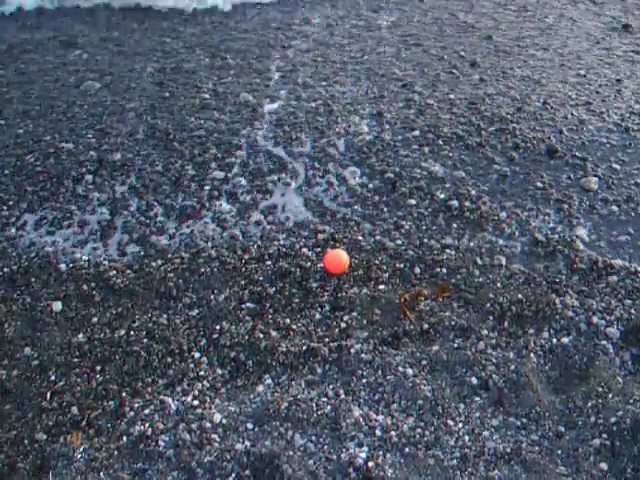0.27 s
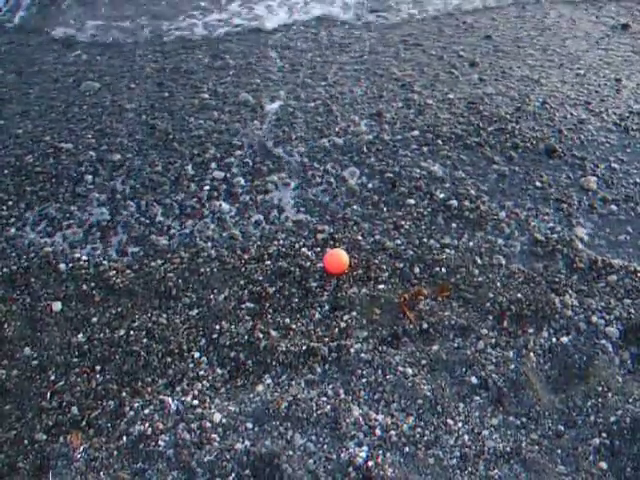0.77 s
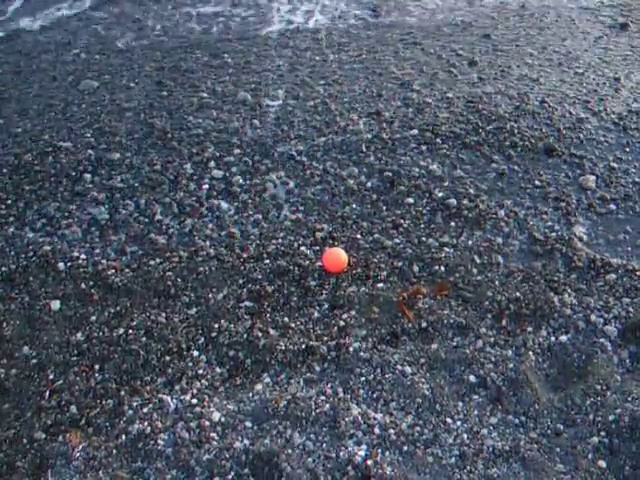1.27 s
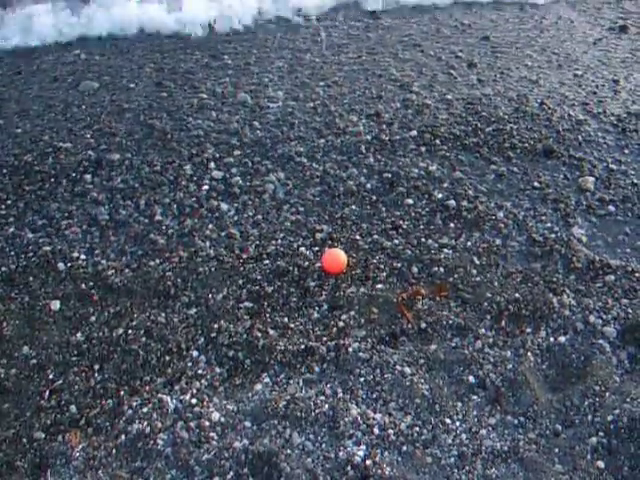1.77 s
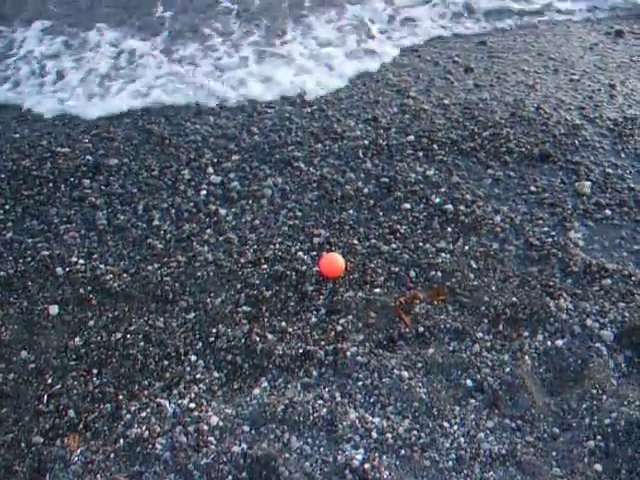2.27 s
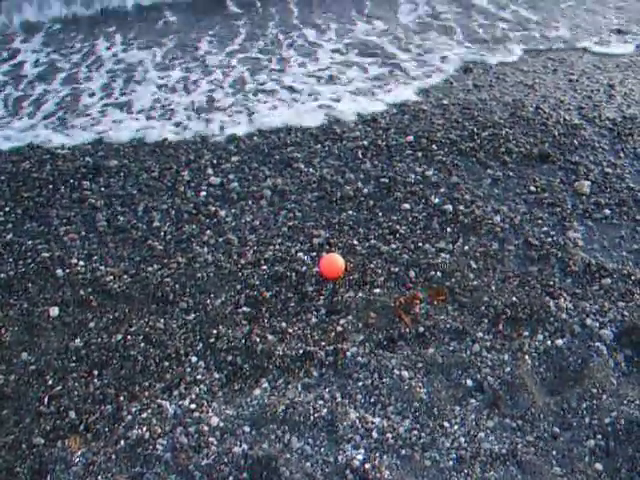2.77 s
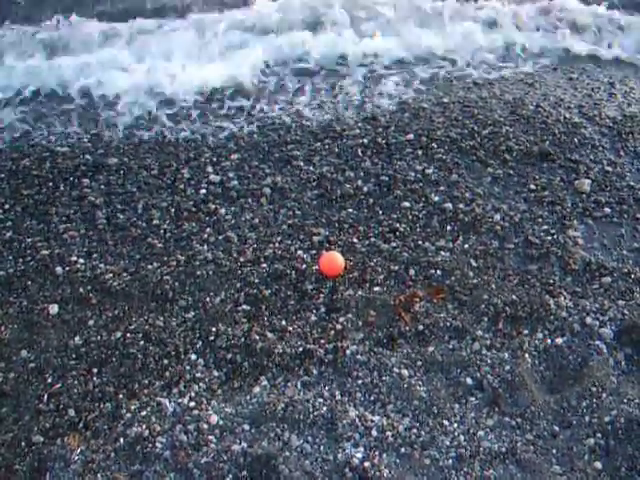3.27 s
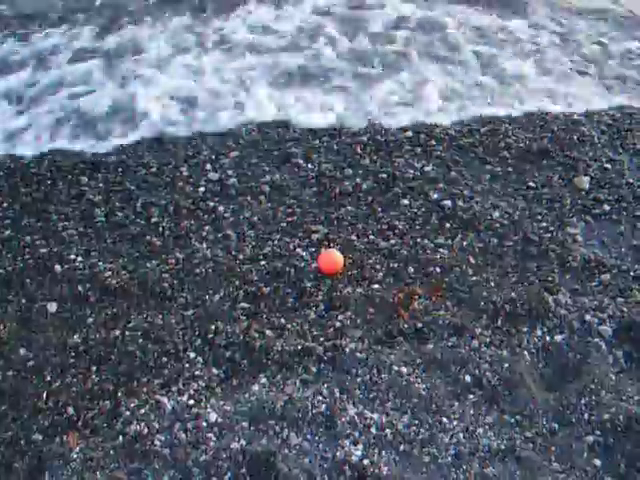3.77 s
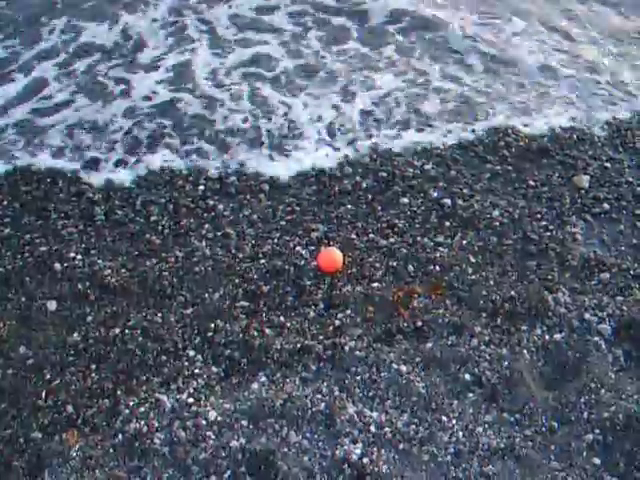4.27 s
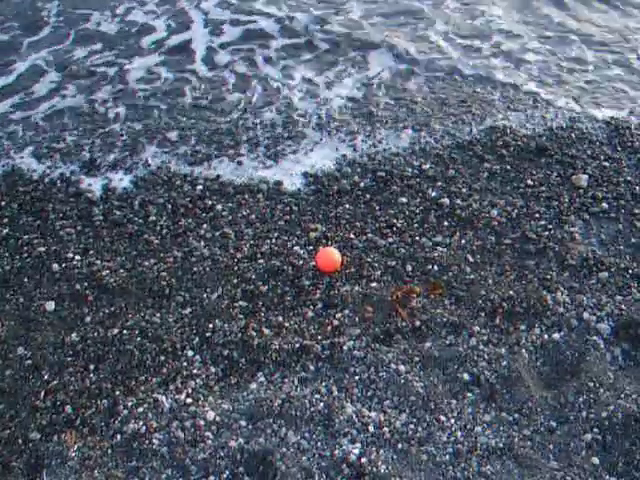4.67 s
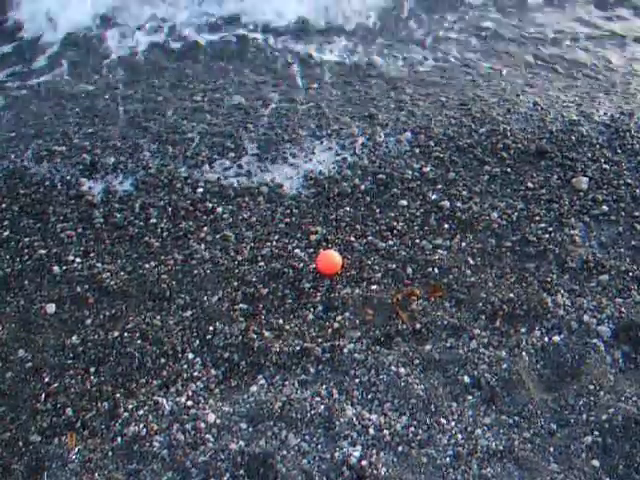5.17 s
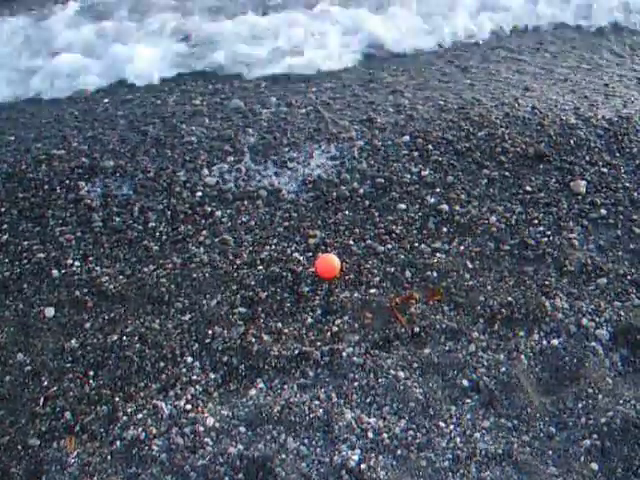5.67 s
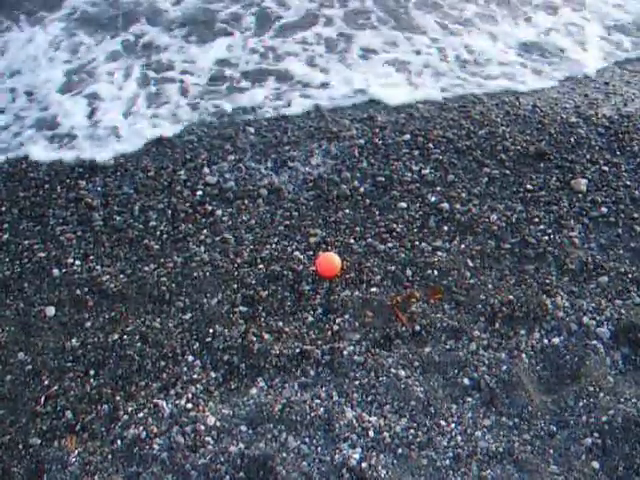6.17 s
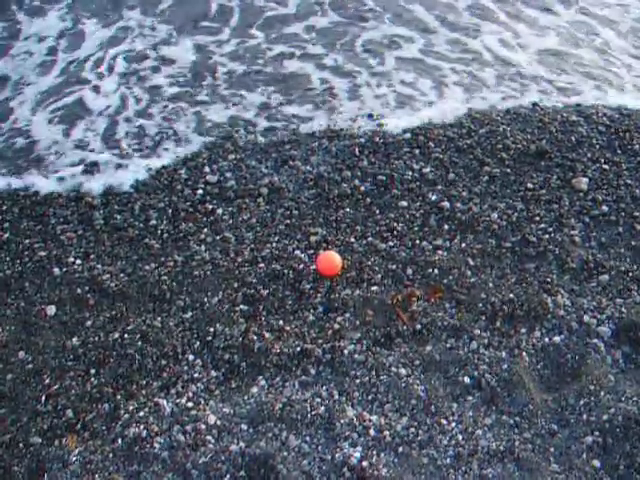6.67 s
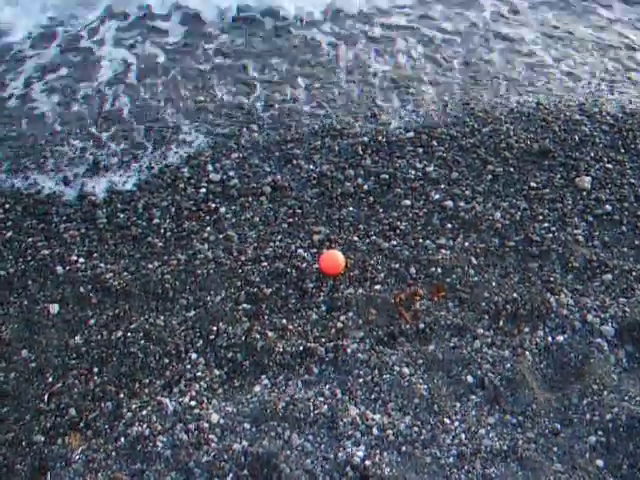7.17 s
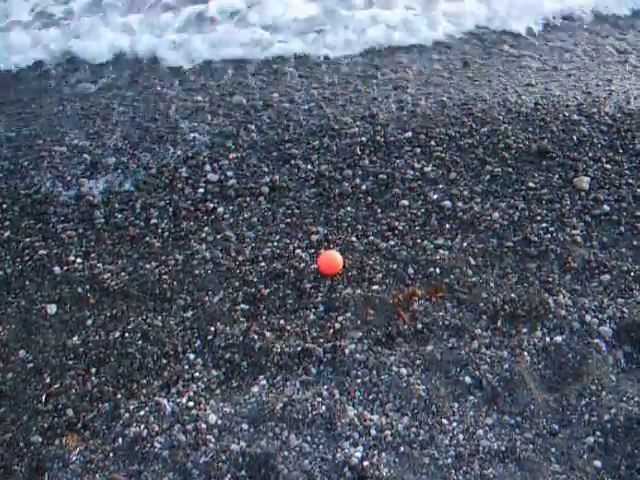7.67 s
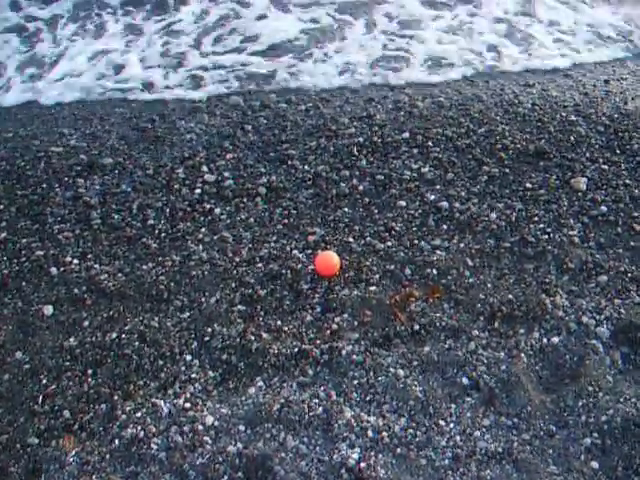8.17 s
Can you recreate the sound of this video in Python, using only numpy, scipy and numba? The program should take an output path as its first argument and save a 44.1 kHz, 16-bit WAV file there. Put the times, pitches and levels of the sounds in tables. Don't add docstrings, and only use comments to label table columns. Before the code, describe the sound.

Small waves on a pebble beach, heard in mono from a few metres by a little camera in open air. Quiet draining water and fizzing foam begin, with small wind puffs and a few pebble knocks before 1.2 s. A breaker swells from about 1 s, with sharp crashes and hissing, rattling wash near 1.7 s; wind thumps cluster around 2 s. Another wave roars at 2.5-3.3 s while gusts buffet the microphone, peaking at 3.5-3.9 s with hard, low pops and dull snaps. Around 4.2-4.6 s it calms to faint foam and tiny stone clicks. Splashing surges again at 4.7 s, under a strong fluttering gust near 5 s, and swells to 5.6 s. Heavy thumps return at 6.1-6.5 s, then a splashy crest at 6.6 s. Pebbly wash and wind continue around 7 s, another wave falls at 7.6 s, the wind eases by 8 s, and a last splash rises near 8.25 s before the end at about 8.4 s.

```python
import sys
import numpy as np
from scipy import signal
from scipy.fft import rfft, irfft, next_fast_len
from scipy.io import wavfile
from scipy.ndimage import uniform_filter1d
from numba import njit

SR = 44100
rng = np.random.default_rng(int(sys.argv[2]) if len(sys.argv) > 2 else 0)


def to_wav(s):
    ch = np.atleast_2d(s).T
    pcm = np.round(np.clip(ch, -1, 1) * 32767)
    wavfile.write(sys.argv[1], SR, pcm.astype(np.int16))


def convert_level_to_amplitude(level_db):
    exponent = np.asarray(level_db, float) / 20
    return 10 ** exponent


N = 371303


def surf(bubble_share=0.39, click_share=0.28, spread_db=2.0, per_second=600.0):
    # (frequency [Hz], spectral density [dB per Hz])
    wash = [(120, -32.5), (200, -3), (238, -6), (377, -3.5), (679, -0.5), (1260, -11.5), (1430, -15),
            (2790, -10), (3960, -13.5), (6480, -15.5), (7590, -17), (8350, -29), (8900, -44), (11600, -65),
            (19600, -120)]
    part_hz = [
        800,
        1700,
        2700,
        5300,
    ]

    swell_db = np.array([db - 10 * np.log10(np.mean(convert_level_to_amplitude(2 * db))) for db in swell()])
    size = next_fast_len(N, real=True)
    freq = np.fft.rfftfreq(size, 1 / SR) + 1
    wash_hz, wash_db = np.transpose(wash)
    colour = convert_level_to_amplitude(np.interp(np.log(freq), np.log(wash_hz), wash_db))

    count = 20000
    when = rng.integers(0, N, count)
    strength = sizes(rng.random(count), 2.65) * rng.choice([-1, 1], count)
    stones = level(np.bincount(when, strength, N), 0)
    spray = level(np.log(uniform_filter1d(stones ** 2, size=400) + 0.1), 0) - 0.5

    out = 0
    surge = walk(13.0)
    neighbour = walk(7.0)
    for hz in 125 * 2 ** np.arange(0, 6.4, 1 / 3):
        small = min(hz / 1500, 1)
        count = int(per_second * N / SR * small ** 0.5)
        bubble_hz = hz * 2 ** (0.34 * rng.random(count) - 0.2)
        strength = sizes(rng.random(count), spread_db * (hz / 2000) ** 0.25)
        bubbles = rings(rng.integers(0, N, count), bubble_hz, 2.52, 0.21, strength)
        water = np.sqrt(1 - bubble_share - click_share * small) * rng.standard_normal(N)
        water = water + np.sqrt(click_share * small) * stones
        water = water + np.sqrt(bubble_share * hz / SR) * level(bubbles, 0)

        window = np.cos(np.pi / 2 * np.clip(3 * np.log2(freq / hz), -1, 1))
        band = irfft(rfft(water, size) * window * colour, size)[:N]
        band = level(band, 0) * np.sqrt(np.sum((window * colour) ** 2))

        place = np.interp(np.log(hz), np.log(part_hz), np.arange(4))
        wave_db = np.clip(1 - np.abs(place - np.arange(4)), 0, 1) @ swell_db
        own = walk(7.0)
        flicker_db = 0.56 * surge + 0.49 * (own + neighbour) + 0.6 * walk(22.0)
        if hz > 7500:
            flicker_db = flicker_db + 0.99 * spray
        out = out + band * convert_level_to_amplitude(wave_db + flicker_db)
        neighbour = own
    return level(out, -25.0)


def swell():
    # (time [s], level [dB])
    roar = [(0.0, -34), (0.68, -32), (0.96, -28), (1.69, -28), (2.18, -33.5), (2.41, -32.5), (2.84, -27),
            (3.14, -25), (3.56, -31), (3.82, -35), (4.55, -33.5), (5.39, -27.5), (5.6, -29), (5.79, -33.5),
            (6.45, -37.5), (6.94, -28.5), (8.09, -33.5), (8.42, -29)]
    # (time [s], level [dB], foam over stones [dB])
    swash = [(0.0, -34, 4), (0.7, -34.5, 0), (1.0, -33.5, 0.5), (1.3, -32, 2), (1.73, -26, -1.5),
             (2.2, -35, -2.5), (2.75, -30, -0.5), (3.26, -29, 2), (3.6, -33.5, -0.5), (3.75, -36, -2),
             (4.35, -43, 5.5), (4.56, -41.5, 4), (4.66, -31.5, 2), (5.5, -29, 1.5), (5.9, -37, 3.5),
             (6.62, -35.5, 2), (7.3, -30.5, 1.5), (8.2, -36.5, 1)]
    # (time [s], lift [dB], fade [s])
    crashes = [
        (0.12, 3.5, 0.11),
        (0.93, 1.5, 0.045),
        (1.72, 4.5, .04),
        (1.82, 5, .04),
        (2.53, 4, 0.046),
        (2.64, 4, 0.064),
        (3.3, 3, .06),
        (4.85, 1.5, 0.062),
        (6.56, 5, 0.18),
        (7.62, 2.5, 0.24),
    ]
    # (time [s], lift [dB], fade [s])
    slops = [(0.58, 3.5, 0.023), (0.84, 1.5, 0.089), (1.15, 3, 0.12), (1.69, 0.5, 0.027), (2.48, 0.5, 0.06),
             (2.76, 3.5, 0.036), (3.2, 1.5, .05), (3.44, 2, .1), (4.73, 5, 0.088), (4.86, 3.5, 0.037),
             (5.35, 0.5, 0.065), (5.98, -1, 0.071), (6.4, 0, 0.085), (6.58, 6.5, 0.19), (6.85, 2, .04),
             (7.04, 2.5, 0.063), (7.85, -0.5, 0.09), (8.25, 3.5, 0.26)]
    # (time [s], depth [dB], recovery [s])
    ducks = [
        (2.865, 5, 0.02),
        (3.61, 2.5, 0.087),
        (5.04, 6.5, 0.061),
        (6.255, 7, 0.16),
        (6.5, -2.5, 0.035),
    ]

    (roar_db,) = curves(roar)
    stones_db, foam_db = curves(swash)
    roar_db = roar_db + sudden(crashes)
    stones_db = stones_db + sudden(slops, 0.035)
    from_roar = 0.13
    splash_db = from_roar * roar_db + (1 - from_roar) * 1.01 * stones_db + 0.57 * foam_db - 6
    return np.array([roar_db, splash_db, stones_db, stones_db + foam_db]) - sudden(ducks, 0.021)


def knocks():
    # (time [s], peak [dB], ring frequency [Hz])
    stones = [(0.607, -11, 2610), (0.737, -17, 2100), (1.1643, -12.5, 2670), (1.583, -13, 3500),
              (2.4894, -21, 2410), (4.41, -17.5, 4740), (4.4373, -16.5, 5660), (4.449, -15.5, 5340),
              (4.6894, -23, 2830), (4.9104, -20.5, 3760), (5.112, -13, 2730), (7.083, -18, 3450),
              (7.296, -12, 4250)]
    s, db, hz = np.transpose(stones)
    return rings((s * SR).astype(int), hz, 6.0, 0.0, convert_level_to_amplitude(db - 6.0))


def wind():
    # (time [s], peak [dB], centre frequency [Hz])
    thumps = [(0.5476, -9.5, 220), (0.7152, -9, 273), (0.753, -15, 252), (1.9126, -23.5, 310),
              (1.9806, -9, 268), (2.024, -8.5, 252), (2.126, -11, 244), (2.1487, -8, 270),
              (2.7741, -9, 411), (2.8128, -8, 254), (2.8348, -6.5, 282), (2.8741, -8, 252),
              (3.6386, -9, 274), (3.398, -9, 248), (3.647, -14, 280), (3.6855, -14, 398),
              (3.7433, -6.5, 500), (3.7834, -13, 224), (3.8667, -10, 206), (4.9126, -7, 244),
              (6.1174, -14, 237), (6.2479, -10, 301), (6.2597, -13, 268), (6.3249, -5.7, 316),
              (6.4283, -11, 246), (6.4436, -5, 257), (6.458, -7.5, 132), (6.4743, -8, 345),
              (6.5929, -12, 287), (6.8335, -8, 216)]
    # (time [s], peak [dB], centre frequency [Hz])
    shoves = [(0.2481, -10, 244), (1.489, -16, 287), (1.506, -10.5, 406), (1.5298, -11, 386),
              (1.9075, -4, 237), (2.0905, -7.5, 200), (3.155, -7.5, 411), (3.5463, -4, 306),
              (3.622, -1.5, 402), (3.694, -11, 268), (3.758, -6.5, 385), (3.8057, -5.5, 232),
              (6.223, -16, 246)]
    # (time [s], peak [dB], ring frequency [Hz])
    rim_snaps = [
        (0.717, -20, 832),
        (3.621, -14, 802),
        (3.684, -10.5, 802),
        (3.742, -12, 802),
        (3.755, -20, 848),
        (3.771, -18.5, 807),
        (3.802, -13.5, 800),
        (6.246, -26, 950),
        (6.324, -23.5, 912),
        (6.443, -23, 802),
    ]

    large_db, small_db = gusts()
    flurry = walk(22.0)
    large = stream(120.0, 67.0, 1.2, 1.1, 0.4) * convert_level_to_amplitude(large_db - 3.0 + 0.44 * flurry)
    small = stream(230.0, 125.0, 1.36, 1.4, 0.25) * convert_level_to_amplitude(small_db - 1.5 + flurry)
    rumble = stream(80.0, 25.0, 0.84, 1.2, 0.36) * convert_level_to_amplitude(-38.5 + 0.2 * (large_db + 34.0))

    s, db, hz = np.transpose(thumps + shoves)
    suction = np.repeat([1, -1], [len(thumps), len(shoves)])
    lean = rng.uniform(-0.55, 0.99, len(s))
    hard = eddies((s * SR).astype(int), hz, lean, suction * convert_level_to_amplitude(db + 0.2), 2.7)
    weak_gain = 1 / (1 + uniform_filter1d(hard ** 2, size=500) / convert_level_to_amplitude(-34.5))

    s, db, hz = np.transpose(rim_snaps)
    snaps = rings((s * SR).astype(int), 1.18 * hz, 2.0, -0.7, convert_level_to_amplitude(db + 1.0))
    return (large + small) * weak_gain + rumble + hard + snaps


def gusts():
    # (time [s], level [dB], large eddies over small [dB])
    breeze = [(0.0, -40.5, 7), (0.52, -39, 0), (0.72, -27.5, -2), (1.2, -38.5, -8), (2.04, -32.5, 6.5),
              (2.3, -37, 7), (2.74, -30.5, 1), (3.17, -29.5, -6), (3.73, -16.5, -7.5), (4.05, -25.5, -5),
              (4.25, -38, -1), (4.48, -38.5, 9), (5.1, -16.5, -8), (5.77, -32, 4.5), (6.85, -20.5, -10),
              (7.8, -24.5, 1), (8.0, -40, 1), (8.42, -36.5, -4)]
    # (time [s], depth [dB], recovery [s])
    lulls = [(0.36, 10, 0.065), (1.33, 7, .03), (1.63, 7, .04), (2.2, 10, .06), (2.72, 9, .03),
             (3.03, 2, .08), (3.43, 7, 0.018), (4.07, 8, .03), (4.6, 12, .04), (5.45, -1.5, 0.065),
             (5.64, 13, 0.045), (6.16, 9, .03), (6.77, 9, 0.027), (7.1, -0.5, 0.092)]
    # (middle [s], length [s], level [dB], large eddies over small [dB])
    puffs = [(0.015, 0.016, -28.5, 1), (0.168, 0.016, -23.5, -3), (0.252, 0.03, -18, -8.5),
             (0.489, 0.01, -21.5, 3), (0.542, 0.02, -23.5, -2), (0.652, 0.015, -22, -7),
             (0.745, 0.054, -32, 5), (1.075, 0.023, -28.5, 1.5), (1.425, 0.043, -34.5, 8.5),
             (1.525, .05, -21, -16), (1.595, 0.022, -28, -5), (1.907, 0.01, -23, -4),
             (1.993, 0.024, -33, 7), (2.097, 0.11, -18, -10), (2.34, 0.021, -32, 6),
             (2.635, 0.035, -23.5, -12.5), (2.875, 0.22, -22.5, -7), (3.366, 0.092, -27.5, 4),
             (3.597, .2, -22, -9), (4.027, 0.048, -27.5, 5), (4.152, 0.11, -26, -5),
             (4.804, 0.025, -21, -8), (4.959, 0.17, -23.5, -5.5), (5.586, 0.054, -22, -6),
             (5.752, 0.056, -18.5, -1), (5.96, 0.062, -30, 2), (6.113, 0.057, -17, -15.5),
             (6.268, 0.11, -19, -13), (6.433, 0.036, -16.5, -14), (7.833, 0.066, -25, 1)]

    t = np.arange(N) / SR
    breeze_db, tilt_db = curves(breeze)
    breeze_db = breeze_db + 2 * walk(12.0) - sudden(lulls)
    power = convert_level_to_amplitude(2 * np.array([breeze_db + tilt_db, breeze_db]))
    edge_db_s = 496
    for s, length, db, large_db in puffs:
        near = slice(max(int((s - length - 0.1) * SR), 0), int((s + length + 0.1) * SR))
        shape_db = db - edge_db_s * np.maximum(np.abs(t[near] - s) - length / 2, 0)
        power[:, near] += convert_level_to_amplitude(2 * np.array([shape_db + large_db, shape_db]))
    return 10 * np.log10(power)


def stream(per_second, low_hz, octaves, spread_db, pushes):
    count = int(per_second * N / SR)
    hz = low_hz * 2 ** (octaves * rng.random(count))
    size = sizes(rng.random(count), spread_db) * np.where(rng.random(count) < pushes, -1, 1)
    lean = rng.uniform(-1, 1, count)
    train = level(eddies(rng.integers(0, N, count), hz, lean, size, 1.74), 0)
    return level(train / np.sqrt(0.15 + uniform_filter1d(train ** 2, size=3000)), 0)


@njit
def eddies(centre, hz, lean, size, skirt):
    out = np.zeros(N)
    for k in range(len(centre)):
        reach = int(skirt * SR / (2 * hz[k]))
        for i in range(max(centre[k] - reach, 0), min(centre[k] + reach, N)):
            u = 5 * hz[k] * (i - centre[k]) / SR
            wide = np.exp(-(u / skirt) ** 2) * (1 + 2 * lean[k] * u / skirt)
            out[i] += size[k] * (wide - skirt * np.exp(-u * u)) / (skirt - 1)
    return out


@njit
def rings(start, hz, cycles, glide, size):
    out = np.zeros(N + 8000)
    for k in range(len(start)):
        step = 2 * np.pi * hz[k] / SR
        length = min(int(5 * cycles * SR / hz[k]), 8000)
        z = size[k] + 0j
        p = np.exp(1j * step - hz[k] / (cycles * SR))
        turn = np.exp(1j * step * glide / length)
        for i in range(length):
            out[start[k] + i] += z.imag
            z, p = z * p, p * turn
    return out[:N]


def sizes(chance, spread_db):
    return convert_level_to_amplitude(spread_db * np.minimum(-np.log(chance), 3.5))


def sudden(table, onset_s=0.0092):
    t = np.arange(0, N / SR + 0.002, 0.001)
    total_db = np.zeros(len(t))
    for s, db, fade in table:
        rise = np.clip((t - s) / onset_s, 0, 1)
        total_db += db * rise * np.exp(-np.maximum(t - s - onset_s, 0) / fade)
    return np.interp(np.arange(N) / SR, t, total_db)


def walk(rate):
    k = int(SR / rate)
    held = np.repeat(rng.standard_normal(N // k + 1), k)
    return level(uniform_filter1d(uniform_filter1d(held, k), k)[:N], 0)


def curves(table):
    s, *columns = np.transpose(table)
    return [np.interp(np.arange(N) / SR, s, c) for c in columns]


def level(x, db):
    return x * convert_level_to_amplitude(db) / np.sqrt(np.mean(x ** 2))


def scene():
    return (surf() + knocks() + wind())[None]


def roll_off(x):
    return signal.sosfilt(signal.butter(12, 9060, fs=SR, output="sos"), x)


def record(dry):
    x = np.tanh(1.088 * dry) / 1.123
    x = signal.sosfilt(signal.butter(1, 24.0, "high", fs=SR, output="sos"), x)
    x = signal.sosfilt(signal.ellip(8, 0.2, 80, 8700, fs=SR, output="sos"), x)
    x = x - 0.0023
    return roll_off(x)


dry = scene()
out = record(dry)
to_wav(out)
```